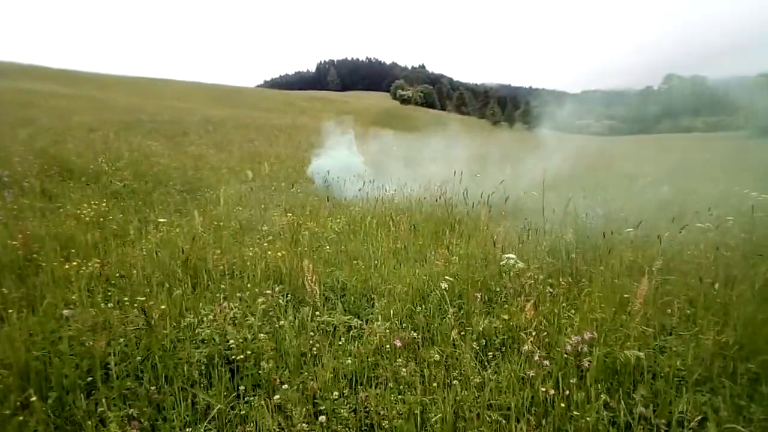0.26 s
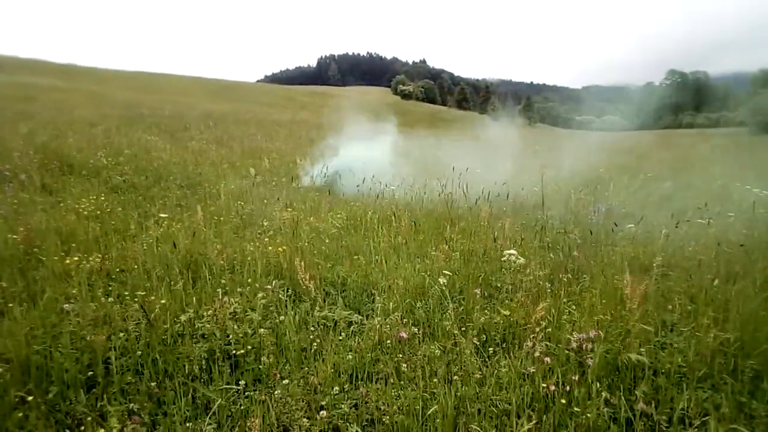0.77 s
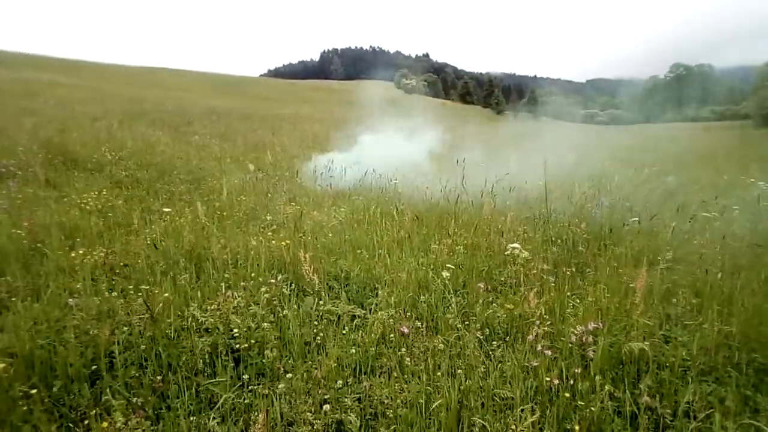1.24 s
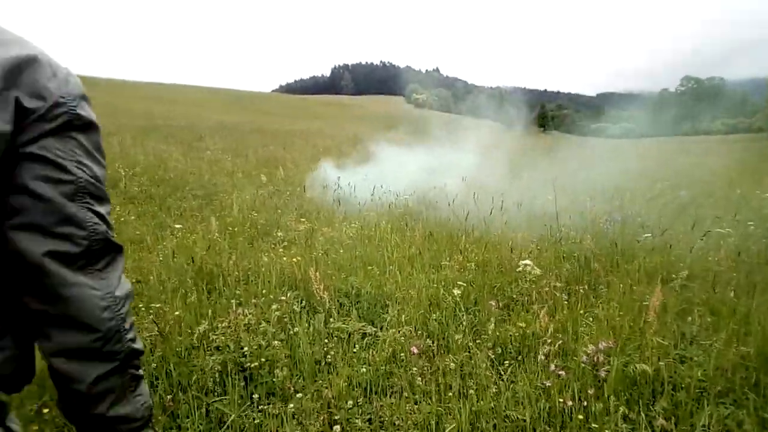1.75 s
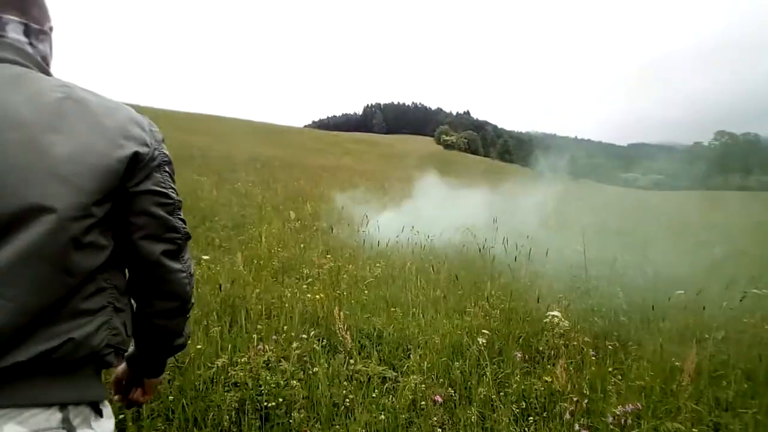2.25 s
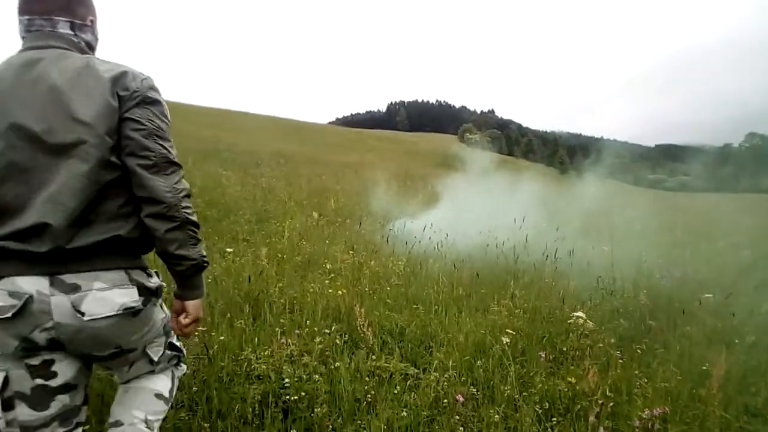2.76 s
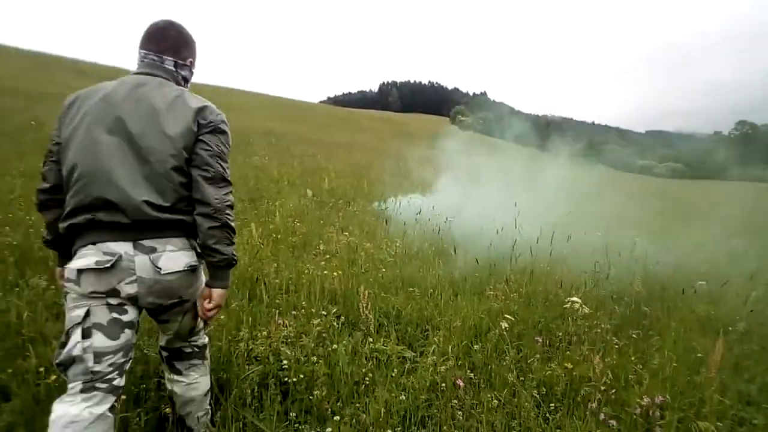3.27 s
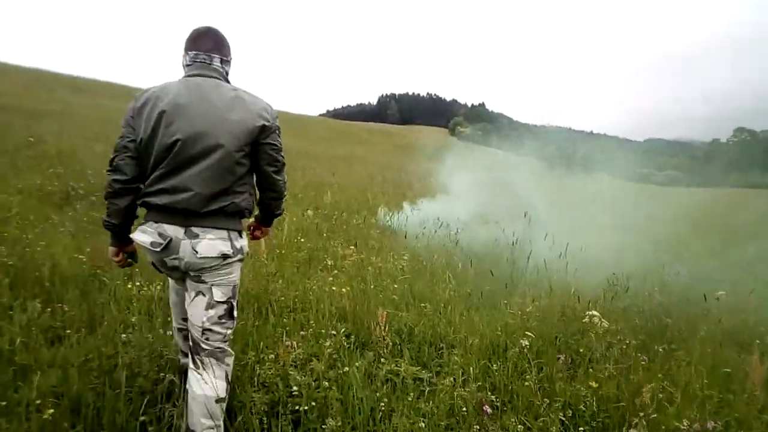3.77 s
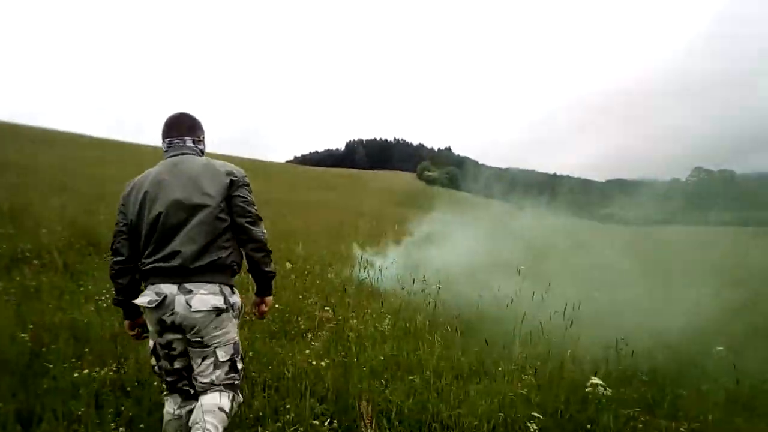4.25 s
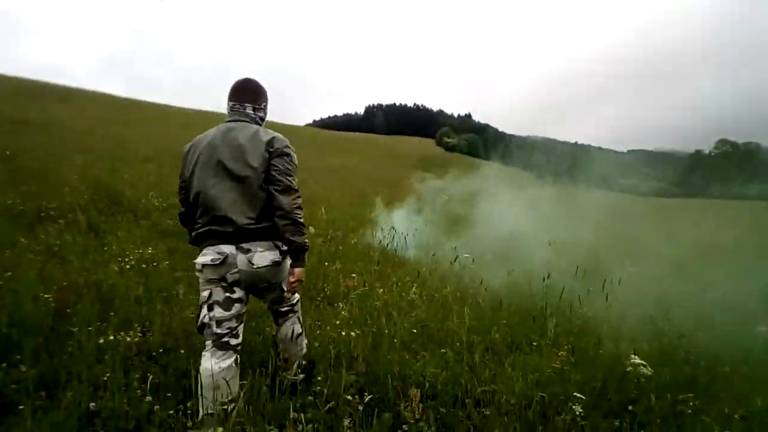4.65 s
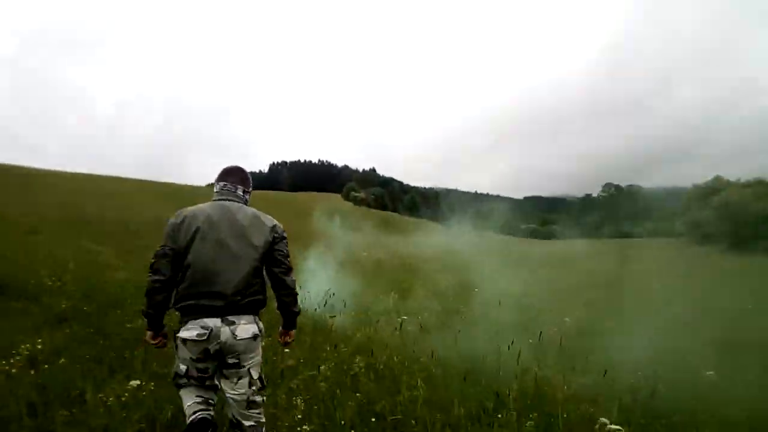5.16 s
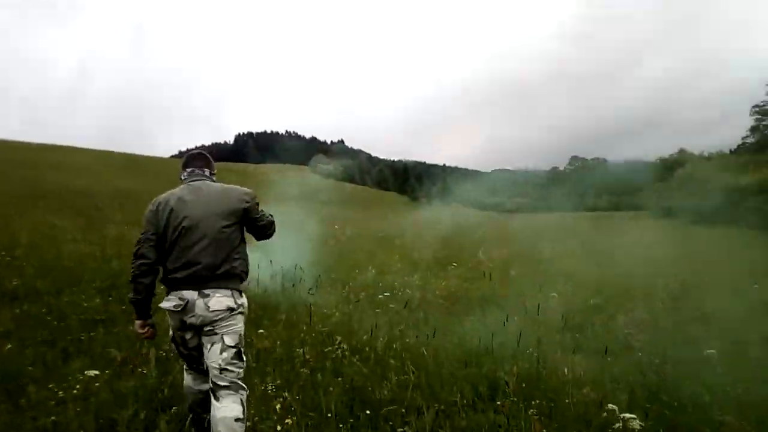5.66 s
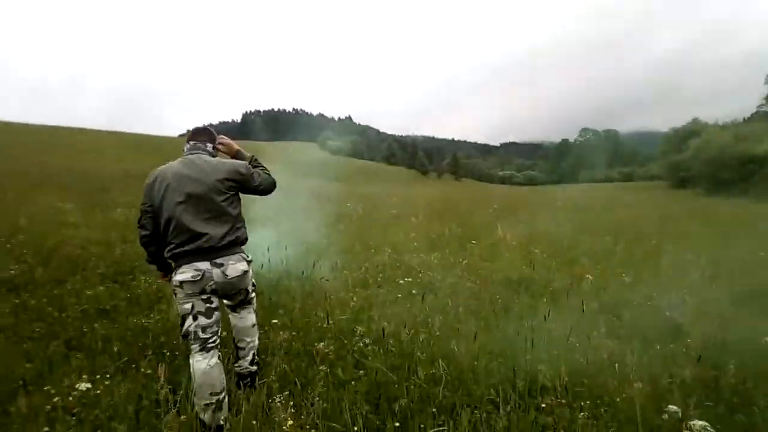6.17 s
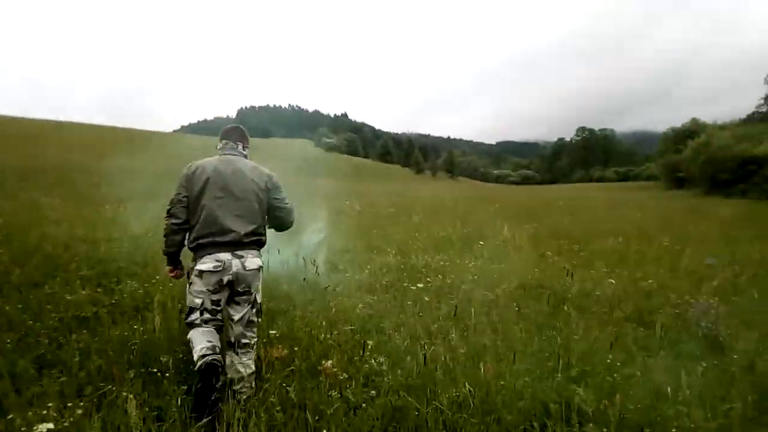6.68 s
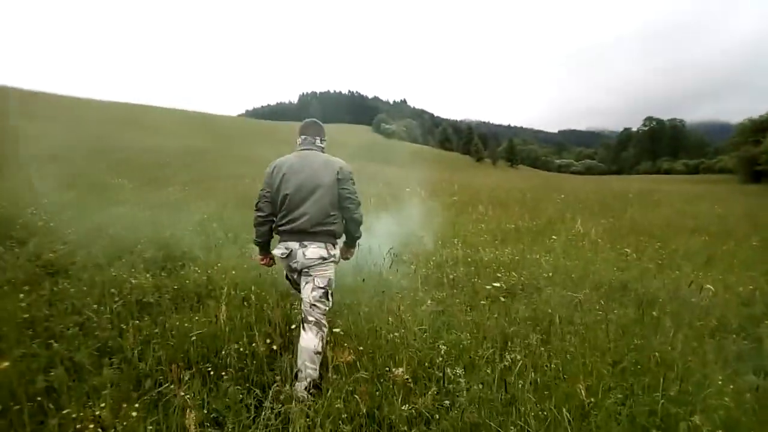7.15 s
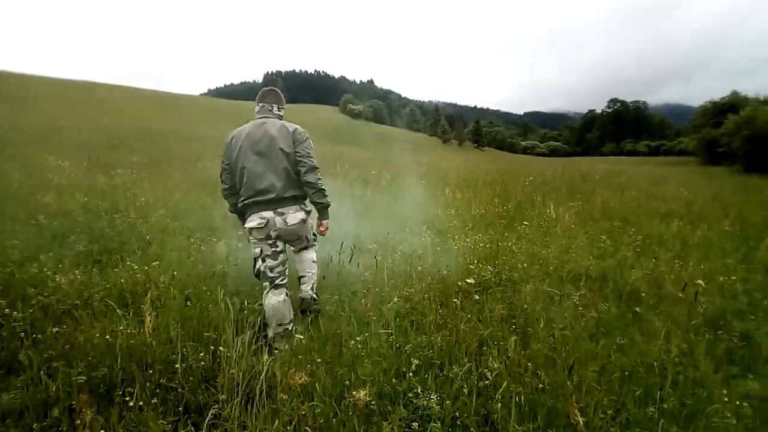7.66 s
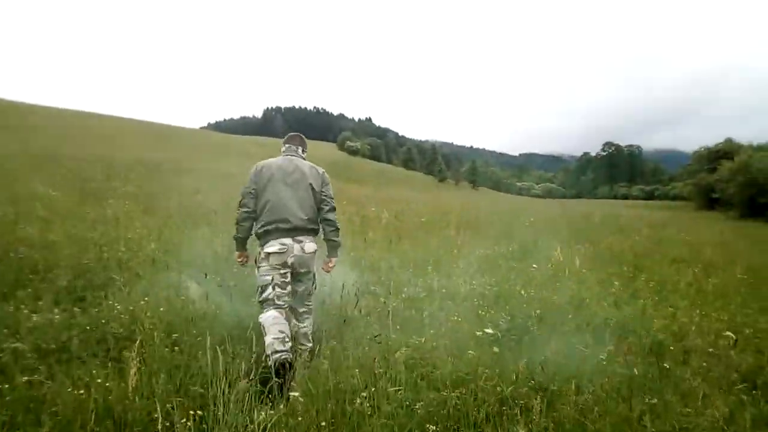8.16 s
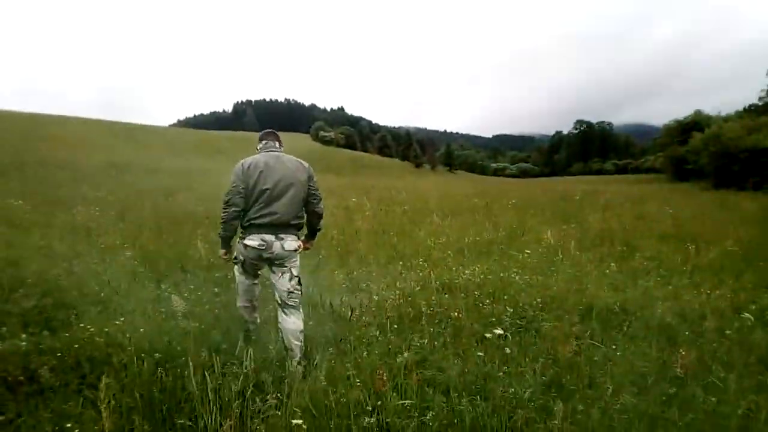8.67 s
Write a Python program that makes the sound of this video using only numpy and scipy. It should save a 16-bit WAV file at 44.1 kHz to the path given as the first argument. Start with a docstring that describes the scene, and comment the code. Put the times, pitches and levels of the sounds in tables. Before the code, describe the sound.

Deep gusty wind blows rumble and pop over soft grass rustle, striding swishes, nylon sleeve rubs, tiny stem snaps and far bird whistles.

```python
"""Wind thumps on a microphone as someone in a nylon jacket wades through tall meadow grass.
Gusts set the strength of coloured turbulence; single eddies are brief pressure pulses with rebounds.
Blades and stalks swish at each stride as dense random impacts, over an unbroken rustle; the jacket rubs
as resonant noise, stems snap as decaying noise bursts, and damp grass squeaks in unsteady gliding tones.
A stirred field and small birds, quavering gliding tones with a short echo, sound faintly from far off."""
import sys
import numpy as np
from scipy import signal
from scipy.fft import rfft, irfft, next_fast_len
from scipy.io import wavfile
from scipy.ndimage import uniform_filter1d, map_coordinates

SR = 44100
rng = np.random.default_rng(int(sys.argv[2]) if len(sys.argv) > 2 else 0)


def inscribe(sig):
    """Save sig as 16-bit PCM at rate SR to the path in sys.argv[1].

    A 1-D sig is mono; a 2-D sig holds one channel per row.
    Samples are clipped to [-1, 1] before scaling.
    """
    pcm = np.round(np.clip(np.atleast_2d(sig).T, -1, 1) * 32767)
    wavfile.write(sys.argv[1], SR, pcm.astype(np.int16))


N = 393372
TIME = np.arange(N) / SR  # s


def undb(db):
    """Level to amplitude: 20 dB for each factor of ten."""
    return 10 ** (np.asarray(db) / 20)


def unit(x):
    """Normalisation to unit rms, the root of the mean power."""
    return x / np.sqrt(np.mean(x ** 2) + 1e-20)


def curves(table):
    """Linear interpolation in time of each column after the first, t/s."""
    t, *columns = np.transpose(table)
    return [np.interp(TIME, t, column) for column in columns]


def colour(x, points):
    """Spectral shaping without phase shift by an outline (f/Hz, level/dB), straight in log f; rms 1."""
    hz, db = np.transpose(points)
    size = next_fast_len(len(x))
    f = np.maximum(np.fft.rfftfreq(size, 1 / SR), 1)
    gain = undb(np.interp(np.log(f), np.log(hz), db))
    return unit(irfft(rfft(x, size) * gain, size)[:len(x)])


def resonance(x, hz, q):
    """Second-order resonance: the bandwidth is the centre frequency over q."""
    b, a = signal.iirpeak(min(hz, SR / 3), max(q, .5), fs=SR)
    return signal.lfilter(b, a, x)


def walk(rate):
    """Slow random modulation: held random values, rate a second, smoothed twice; rms 1."""
    k = int(SR / rate)
    held = np.repeat(rng.standard_normal(N // k + 1), k)
    return unit(uniform_filter1d(uniform_filter1d(held, k), k)[:N])


def add(out, s, sound):
    """Superposition of a short sound at time s."""
    i = max(int(s * SR), 0)
    out[i:i + len(sound)] += sound[:max(N - i, 0)]


def swell(start, end, attack, release, roundness):
    """Envelope that rises up to start, holds and falls from end; roundness 1 is exponential, 2 a bell."""
    before = np.maximum(start - TIME, 0) / max(attack, .002)
    after = np.maximum(TIME - end, 0) / max(release, .002)
    return np.exp(-np.minimum(before + after, 9) ** roundness)


def gust_pressure():
    """Addition of powers: gusts rise, hold and die away over a swaying breeze; returns level in dB."""
    # gusts, from brief puffs to long blows: middle t/s, hold length/s, pressure level/dB
    gust_table = [(0.149, 0.14, -33.5), (0.292, 0.035, -28.5), (0.39, .16, -37), (0.547, 0.058, -31),
                  (0.633, 0.031, -45.5), (0.795, 0.031, -44), (0.9, 0.031, -64), (1.112, .04, -45.5),
                  (1.248, 0.065, -44.5), (1.423, 0.013, -54.5), (1.539, 0.042, -39), (1.672, 0.072, -56),
                  (1.941, 0.092, -41), (2.048, 0.026, -31), (2.151, .11, -35.5), (2.282, 0.042, -37.5),
                  (2.403, 0.098, -36), (2.564, .13, -35), (2.682, 0.069, -37.5), (2.771, 0.026, -37.5),
                  (3.038, 0.016, -43.5), (3.134, 0.035, -39), (3.435, 0.016, -43.5), (3.671, 0.042, -42),
                  (3.993, 0.046, -36), (4.105, .05, -33), (4.199, 0.057, -43.5), (4.284, 0.0076, -27.5),
                  (4.341, 0.013, -30), (4.502, .16, -31.5), (4.871, 0.54, -43.5), (4.8, 0.024, -29.5),
                  (5.166, 0.077, -36), (5.276, 0.034, -33.5), (5.394, 0.016, -42.5), (5.553, .14, -28),
                  (5.669, 0.082, -38), (5.997, 0.23, -45), (6.12, 0.062, -32.5), (6.333, 0.12, -26),
                  (6.514, .17, -29.5), (6.732, .16, -28.5), (7.043, 0.028, -36), (7.17, 0.34, -44),
                  (7.261, 0.0098, -39.5), (7.46, .02, -32.5), (7.517, .03, -50), (7.673, 0.012, -56),
                  (7.74, .02, -46.5), (7.871, 0.075, -45), (8.032, .13, -50.5), (8.305, 0.017, -36),
                  (8.392, 0.017, -42.5), (8.563, .15, -26.5), (8.783, 0.22, -39)]
    attack_s, release_s = .013, .015
    breeze_db, breeze_sway_db = -65, 5  # the air between gusts
    power = undb(breeze_db + breeze_sway_db * walk(12)) ** 2
    for s, length, db in gust_table:
        shape = swell(s - length / 2, s + length / 2, attack_s, release_s, roundness=1.1)
        power = power + (undb(db) * shape) ** 2
    return 10 * np.log10(power)


def steady_swirl(points):
    """Coloured turbulence divided by its short-term rms, so that the gust mostly sets its strength."""
    x = colour(rng.standard_normal(N), points)
    return x / np.sqrt(uniform_filter1d(x ** 2, size=1300) + 0.047)


def wind(pressure_db, gust_db=0.0, deep_db=-8, deep_growth=-0.48, fine_db=-21, fine_growth=0.28, flutter_db=3.0):
    """Turbulent cascade: soft air rolls in slow deep swirls, harder gusts break into finer ones."""
    # outline of the deep swirls: f/Hz, relative level/dB
    lull_colour = [(20, -10), (32, -5), (50, 3.5), (80, 8.5), (115, -1), (180, -20.5), (400, -71),
                   (1200, -110)]
    # outline of the rumble: f/Hz, relative level/dB
    wind_colour = [(20, -22.5), (32, -14.5), (50, -4.5), (75, 2), (120, 4.5), (170, -3.5), (250, -18),
                   (400, -32), (700, -43), (2500, -110)]
    fine_colour = [(100, -23.5), (220, 0.5), (350, -6), (550, -17), (800, -23), (1300, -40), (3000, -100)]
    force_db = pressure_db + 40  # the growth settings are dB per dB of force
    deep = steady_swirl(lull_colour) * undb(deep_db + deep_growth * force_db)
    rumble = steady_swirl(wind_colour)
    gusty_noise = rng.standard_normal(N) * undb(4.4 * walk(90))
    fine = colour(gusty_noise, fine_colour) * undb(fine_db + fine_growth * force_db)
    flutter = undb(flutter_db * walk(60))
    return undb(pressure_db + gust_db) * flutter * (deep + rumble + fine)


def shed_eddies(pressure_db):
    """Random vortex shedding: lesser eddies, stronger and faster as the gust grows; rows as in eddies."""
    shed_per_s, shed_db, scatter_db = 25, 8, 2
    shed_hz, octaves_per_db = 150, .025  # middle rate at zero force, and its growth
    slot_s = .01
    slots = np.arange(0, TIME[-1], slot_s)
    chance, scatter = rng.random((len(slots), 2)), rng.standard_normal((len(slots), 2))
    s = slots + slot_s * chance[:, 0]
    db = np.interp(s, TIME, pressure_db)
    force_db = db + 40
    hz = shed_hz * 2 ** (octaves_per_db * force_db + .2 * scatter[:, 1])
    rows = np.column_stack([s, db + shed_db + scatter_db * scatter[:, 0], hz])
    shed = (chance[:, 1] < shed_per_s * slot_s) & (force_db > -5)  # none in weak air
    return list(rows[shed])


def eddies(pressure_db, eddy_db=-5.5, size_scale=1.09, core_db=-15, core_ratio=2.1, leak_hz=70):
    """Convected vortices: each is one pressure swing with a tight core and rebounds; small ones pass faster."""
    # hardest eddies at the microphone port: t/s, peak level before eddy_db/dB, rate before size_scale/Hz
    hard_eddies = [(0.023, -16.5, 174), (0.08, -23, 155), (0.133, -17.5, 186), (0.293, -12, 156),
                   (0.481, -17.5, 158), (0.538, -9.5, 263), (1.956, -20.5, 218), (2.042, -11.5, 148),
                   (2.407, -18, 337.2), (2.427, -22.5, 300), (2.537, -12.5, 372), (2.602, -22, 279),
                   (4.102, -19, 138), (4.459, -9.5, 179.9), (4.534, -5, 250), (4.561, -15.5, 292.2),
                   (4.809, -11, 214.7), (5.133, -17.5, 198), (5.269, -14.5, 170), (5.499, -16, 132.8),
                   (5.541, -12.5, 158), (5.577, -9, 200), (6.083, -22, 226), (6.102, -13.5, 223.3),
                   (6.265, -6, 151.2), (6.279, -6.5, 146), (6.316, -10, 219), (6.336, -11.5, 300),
                   (6.35, -18.5, 316), (6.376, -11, 216.5), (6.389, -16, 364), (6.482, -12, 250),
                   (6.648, -21.5, 277), (6.689, -11.5, 222), (6.72, -9, 183.6), (6.771, -11.5, 380),
                   (6.785, -15.5, 267), (6.816, -13, 195), (7.024, -23.5, 279.7), (8.296, -17.5, 161.2),
                   (8.488, -12.5, 173.6), (8.517, -12, 187.4), (8.543, -13.5, 355.3), (8.571, -17.5, 245),
                   (8.728, -10.5, 180)]
    out = np.zeros(N)
    t = np.arange(-800, 800) / SR
    turns = rng.random(size=1000)
    for (s, db, hz), turn in zip(list(hard_eddies) + shed_eddies(pressure_db), turns):
        body = (np.pi * hz * t / size_scale) ** 2
        core = body * core_ratio ** 2
        swing = (1 - 2 * body) * np.exp(-body) + undb(core_db) * (1 - 2 * core) * np.exp(-core)
        lopsided = signal.hilbert(swing) * np.exp(2j * np.pi * turn)  # it may graze the port at any angle
        add(out, s + t[0], undb(db + eddy_db) * lopsided.real)
    # the finest pressure averages out across the port; the slowest leaks past the diaphragm, which swings back
    out = signal.sosfiltfilt(signal.butter(3, 880, fs=SR, output="sos"), out)
    return signal.sosfilt(signal.butter(3, leak_hz, "high", fs=SR, output="sos"), out)


def contacts(rate, spread_db):
    """Random impact process: blade hits blade, rate a second, most weakly and a few strongly."""
    hit = rng.random(N) < rate / SR
    strength = undb(spread_db * np.minimum(rng.exponential(size=N), 5))
    return hit * rng.standard_normal(N) * strength


def sweeps():
    """Addition of powers: leg sweeps swell over the unbroken rustle; returns stalk, tip, leaf amplitudes."""
    # legs or boots sweeping through grass: fastest t/s, length/s, swish level/dB, tip level above swish/dB
    strides = [(0.874, 0.13, -64, 2.5), (1.162, 0.37, -64.5, -3), (1.545, 0.048, -66, -5.5),
               (1.89, 0.4, -64, -9), (2.357, 0.1, -67.5, -18), (2.686, 0.2, -77, -5),
               (3.02, .05, -62.5, -21), (3.19, 0.51, -62, -27), (3.433, 0.24, -60.5, -28),
               (3.826, 0.26, -64.5, -13.5), (4.128, .07, -59, -21), (4.205, 0.11, -59.5, -18.5),
               (4.686, 0.31, -60, -13), (4.916, 0.12, -57.5, -28), (5.043, 0.083, -57.5, -23),
               (5.158, .1, -67, -22), (5.401, 0.19, -61, -29), (5.534, 0.16, -64.5, -5),
               (5.676, .07, -62.5, -7.5), (5.853, 0.15, -60.5, -26), (6.087, 0.17, -62, -23.5),
               (6.23, 0.15, -58, -11), (6.563, 0.061, -61, -22), (6.652, 0.068, -60, -24),
               (6.94, 0.16, -60, -18), (7.128, 0.41, -65, -13), (7.347, 0.047, -70, -5),
               (7.538, 0.088, -57, -18), (7.927, 0.23, -53.5, -8), (8.09, 0.29, -66, -6),
               (8.628, 0.12, -67.5, -5.5), (8.837, .2, -62.5, -8)]
    # unbroken rustle before its shares: t/s, low leafy level/dB, high stalky level/dB
    rustle_levels = [(0.0, -69, -81.5), (0.72, -66, -71), (1.02, -65, -61.5), (2.78, -61, -67.5),
                     (3.3, -61, -58.5), (3.55, -61.5, -66.5), (6.18, -56, -62), (6.31, -61, -65),
                     (6.88, -58.5, -68.5), (7.05, -57.5, -60), (8.65, -60.5, -64), (8.92, -56, -56)]
    rise_share, stride_leaf_db = 0.47, -3  # share of a sweep spent speeding up; soft leaves against swish
    leaf_db, stalk_db, tip_db = -1.5, -2, -19  # shares in the unbroken rustle
    stalks, tips = 0, 0
    for s, length, db, tips_db in strides:
        shape = swell(s, s, length * rise_share, length * (1 - rise_share), roundness=2.4)
        power = (undb(db) * shape) ** 2
        stalks = stalks + power
        tips = tips + power * undb(tips_db) ** 2
    low_db, high_db = curves(rustle_levels)
    stalk_force = np.hypot(np.sqrt(stalks), undb(high_db + stalk_db))
    tip_force = np.hypot(np.sqrt(tips), undb(high_db + tip_db))
    leaf_force = np.hypot(np.sqrt(stalks) * undb(stride_leaf_db), undb(low_db + leaf_db))
    return stalk_force, tip_force, leaf_force


def tufts(x, depth_db, rate, width_hz):
    """Time-varying spectrum: each tuft has its colour, so neighbouring bands swell and fade on their own."""
    f, t, bands = signal.stft(x, SR, nperseg=512)
    chance = rng.standard_normal((400, 1200))
    grid = np.meshgrid(f / width_hz, t * rate, indexing="ij")
    band_sway = unit(map_coordinates(chance, grid, order=1, mode="wrap"))
    swayed = signal.istft(bands * undb(depth_db * band_sway), SR)[1][:N]
    return unit(swayed) * np.std(x)


def ground_echo(x, lag_s, share, sway):
    """Interference with a ground reflection, whose lag shifts as walker and camera move."""
    late = TIME - lag_s * (1 + sway * walk(3))
    return x + share * map_coordinates(x, [late * SR], order=3)


def grass(blade_db=-0.4, tip_db=0.5, leaf_db=0.0):
    """Dense impact noise of blades along the legs: soft leaves low, stalks in the middle, dry tips on top."""
    # outline of the leaves: f/Hz, relative level/dB
    leaf_colour = [(250, -27), (500, -6), (800, -5.5), (1300, -0.5), (2000, 0), (2800, -2), (3500, -6.5),
                   (4500, -32.5), (7000, -37.5)]
    # outline of the stalks: f/Hz, relative level/dB
    swish_colour = [(1500, -11), (2600, 2.5), (3500, 1.5), (4300, 0), (5300, 1.5), (6400, 2.5),
                    (7200, -3.5), (8000, -16), (10000, -37), (15000, -35)]
    # outline of the dry tips: f/Hz, relative level/dB
    tip_colour = [(4000, -18.5), (6500, 4), (8000, -1), (9500, -4), (11000, -13.5), (13000, -17),
                  (15500, -16.5)]
    stalk_force, tip_force, leaf_force = sweeps()
    soft, stiff, dry_hits = contacts(8000, 2.3), contacts(10000, 2.2), contacts(9000, 2.2)
    leaves = colour(soft, leaf_colour) * leaf_force * undb(leaf_db)
    stalks = colour(stiff, swish_colour) * stalk_force * undb(blade_db)
    tips = colour(dry_hits, tip_colour) * tip_force * undb(tip_db)
    catch = undb(1.28 * walk(35))  # blades catch and let go
    rustle = tufts(catch * (leaves + stalks + tips), depth_db=2.2, rate=18, width_hz=220)
    return ground_echo(rustle, lag_s=.0024, share=0.32, sway=0.1)


def meadow(air_db=-70):
    """Incoherent sum of many far blades, heard as soft noise: the breeze stirs the whole field."""
    # outline of the field: f/Hz, relative level/dB
    meadow_colour = [(200, 3), (600, 0), (1000, -1), (2000, -6.5), (3000, -5.5), (4000, -8.5), (6500, -16),
                     (8000, -21), (12000, -49.5)]
    field = colour(rng.standard_normal(N), meadow_colour)
    return tufts(field, depth_db=6, rate=11, width_hz=88) * undb(air_db)


def glides(table, wobble, overtones_db):
    """Frequency modulation of harmonic tones along an arch; overtones_db lists harmonics from the first."""
    out, unsteady = np.zeros(N), 1 + wobble * walk(500)
    for s, length, db, *arch_hz in table:
        start, n = int(s * SR), int(length * SR)
        arch = np.polyfit([0, .5, 1], arch_hz, 2)
        hz = np.polyval(arch, np.linspace(0, 1, n))
        phase = 2 * np.pi * np.cumsum(hz * unsteady[start:start + n]) / SR
        tone = sum(undb(h) * np.sin((k + 1) * phase) for k, h in enumerate(overtones_db))
        add(out, s, tone * signal.windows.tukey(n, .5) * undb(db))
    return out


def birds(echo_db=-6, quaver_db=4.5):
    """Amplitude-modulated whistles, smeared by a decaying diffuse reflection from the hillside."""
    # far notes: start t/s, length/s, level before quaver and echo/dB, first, middle and last f before wobble/Hz
    bird_notes = [(.21, 0.055, -67, 2450, 2400, 2360), (.37, 0.042, -70, 2750, 2830, 2800),
                  (.48, 0.06, -61, 2410, 2370, 2350), (.66, 0.049, -66, 2980, 2960, 2920),
                  (2.09, 0.084, -59, 3620, 3570, 3550), (2.23, 0.053, -60, 3650, 3770, 3820),
                  (2.39, 0.084, -55.5, 3620, 3560, 3470), (2.855, 0.033, -54, 3950, 3890, 3594),
                  (3.2, .04, -61, 3700, 3620, 3560), (3.5, 0.14, -62, 3350, 3214, 3310),
                  (4.17, .09, -61, 3860, 3830, 3800), (4.29, 0.082, -62, 3640, 3510, 3300),
                  (4.885, 0.08, -49, 3450, 3320, 3018), (5.48, 0.068, -56, 2600, 2796, 3050),
                  (6.058, 0.13, -51, 4250, 3426, 3330), (6.31, 0.043, -62.5, 4960, 4400, 4250),
                  (7.15, 0.059, -51, 3300, 3100, 2580)]
    quaver = unit(undb(quaver_db * walk(110)))
    calls = glides(bird_notes, wobble=0.014, overtones_db=[0]) * quaver
    t = TIME[:SR // 4]
    tail = rng.standard_normal(len(t)) * np.exp(-t / .03)
    return calls + undb(echo_db) * signal.fftconvolve(calls, tail / np.linalg.norm(tail))[:N]


def sleeve(rub_db=-2.0, top_hz=6000):
    """Friction noise: nylon slides in quick little jerks through a band set by the speed of the arm."""
    # jacket rubs as the arms swing, and a scuff of leaves near 5.4 s: middle t/s, length/s, level before
    # rub_db/dB, centre f/Hz
    rub_table = [(0.908, 0.16, -60.5, 3450), (1.12, 0.44, -59, 3540), (1.894, 0.67, -59.5, 2670),
                 (3.301, 0.84, -59, 2236), (4.098, 0.21, -56, 1480), (5.413, 0.21, -54.5, 2160),
                 (5.76, 0.21, -49, 1950), (6.122, 0.18, -49, 1620), (6.55, 0.078, -53, 2597),
                 (6.607, 0.054, -51.5, 2280), (6.638, .08, -53, 3420), (7.464, 0.047, -53.5, 1970),
                 (8.292, 0.095, -55, 1840)]
    out = np.zeros(N)
    rub = rng.standard_normal(N) * undb(3 * walk(220))
    for s, length, db, hz in rub_table:
        start, n = int((s - length / 2) * SR), int(length * SR)
        band = resonance(resonance(rub[start:start + n], hz, 1.7), hz, 1.7)
        add(out, start / SR, unit(band) * signal.windows.tukey(n, .8) * undb(db + rub_db))
    return signal.sosfilt(signal.butter(4, top_hz, fs=SR, output="sos"), out)


def snaps(snap_db=0, q=0.95, muffle_hz=7500):
    """Impulsive excitation of a damped resonance: a stem cracks, muffled by the grass around it."""
    # snapping stems: t/s, peak level before muffling/dB, centre f/Hz, decay time/s
    snap_table = [(3.221, -43, 2600, 0.0018), (3.988, -46, 2500, 0.0011), (4.291, -42, 1920, 0.0032),
                  (4.677, -46, 8060, 0.001), (5.68, -47, 6040, 0.002), (5.819, -43, 2000, .002),
                  (5.986, -32.5, 2400, 0.0009), (6.198, -39.5, 7310, 0.0048), (6.786, -42, 1841, 0.0045),
                  (7.346, -40.5, 6160, 0.0042), (8.474, -37, 2186, 0.0015)]
    out, t = np.zeros(N), TIME[:2048]
    noises = rng.standard_normal((len(snap_table), len(t)))
    for (s, db, hz, decay), noise in zip(snap_table, noises):
        crack = resonance(resonance(noise * np.exp(-t / decay), hz, q), hz, q)
        add(out, s, crack / np.abs(crack).max() * undb(db + snap_db))
    return signal.sosfilt(signal.butter(2, muffle_hz, fs=SR, output="sos"), out)


def squeaks():
    """Stick-slip of a damp blade on rubber, rendered as short unsteady tones with weak harmonics."""
    # squeaks on a boot: start t/s, length/s, level of first harmonic/dB, first, middle, last f before wobble/Hz
    squeak_table = [(5.034, 0.015, -44, 1947, 1635, 1753), (5.045, 0.015, -35, 1856, 2016, 2073),
                    (6.603, 0.0121, -42, 1000, 1197, 1309), (6.62, 0.011, -45.5, 1050, 1333, 1450)]
    return glides(squeak_table, wobble=.06, overtones_db=[0, -24, -20])


def scene():
    """Linear superposition of wind at the microphone, the walker close by, and far meadow and birds."""
    pressure_db = gust_pressure()
    air = wind(pressure_db) + eddies(pressure_db)
    walker = grass() + sleeve() + snaps() + squeaks()
    return (air + walker + meadow() + birds())[None]


def record(dry, hiss_db=-77):
    """Additive noise and band limiting: the camera adds a faint hiss and cuts the top."""
    # outline of the hiss: f/Hz, relative level/dB
    hiss_colour = [(100, -1.5), (4000, -5.5), (8000, -20), (11000, -4.5), (13800, -9.5), (14800, 7),
                   (15500, 2.5)]
    top_hz = 15550
    hiss = colour(rng.standard_normal(N), hiss_colour) * undb(hiss_db)
    return signal.sosfilt(signal.ellip(10, .2, 80, top_hz, fs=SR, output="sos"), dry + hiss)


dry = scene()
out = record(dry)
inscribe(out)
```